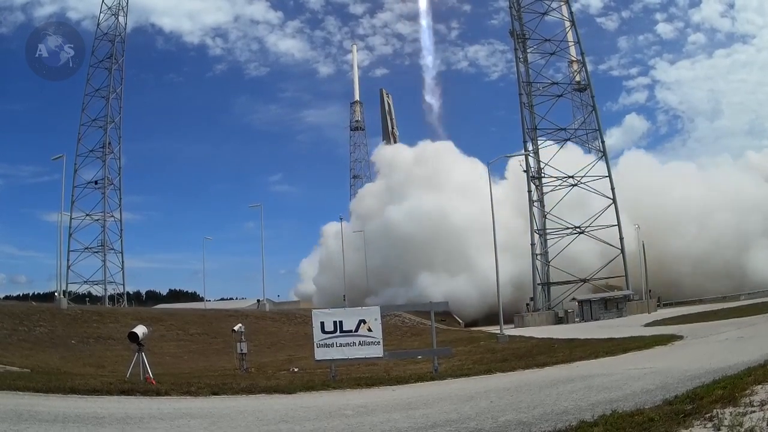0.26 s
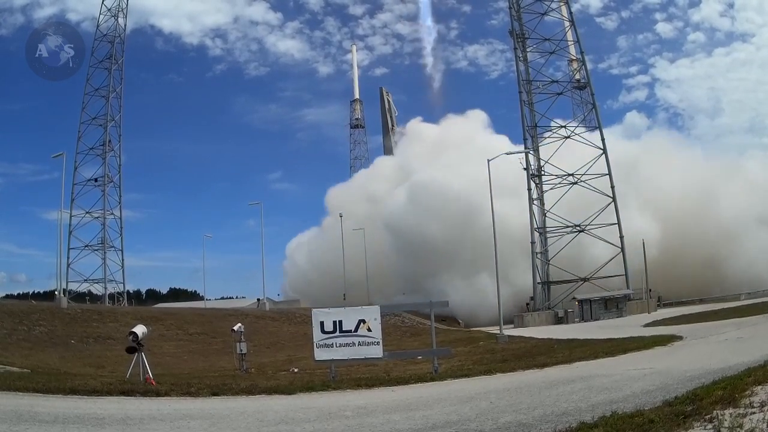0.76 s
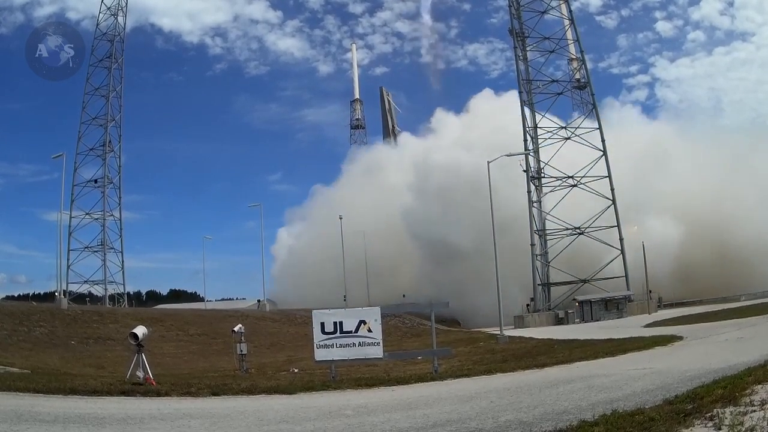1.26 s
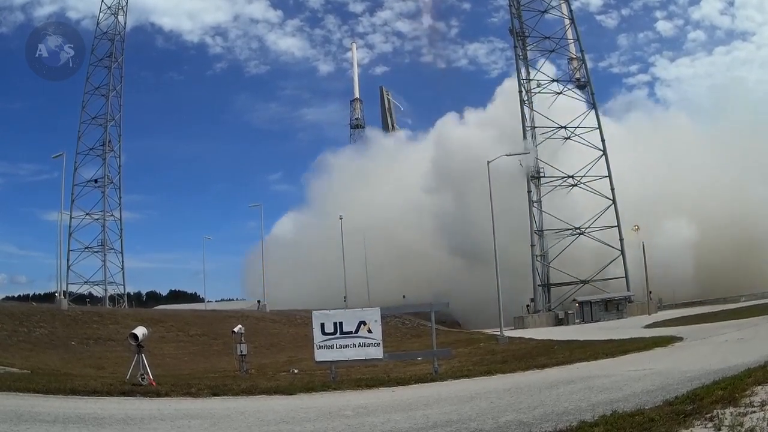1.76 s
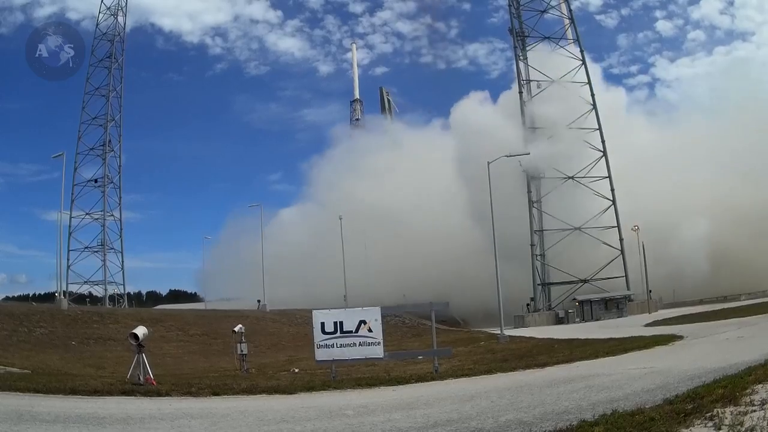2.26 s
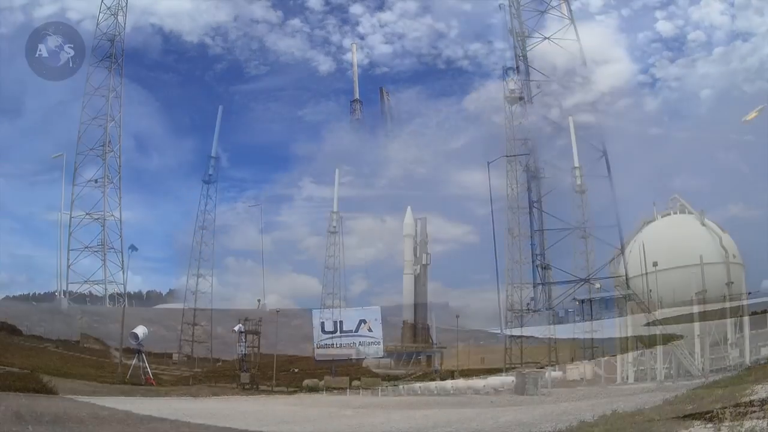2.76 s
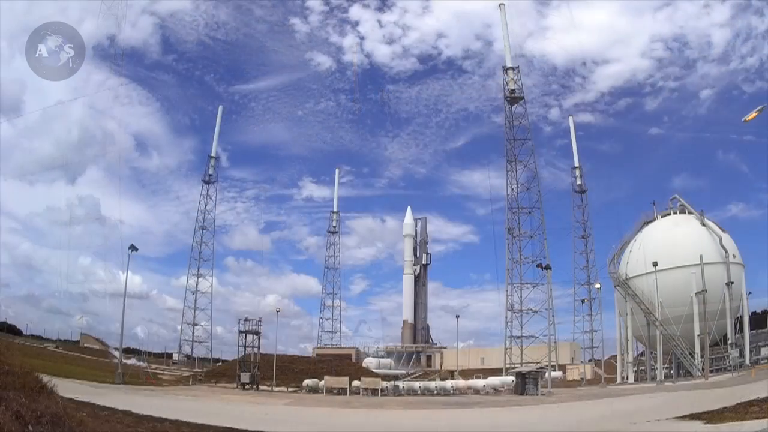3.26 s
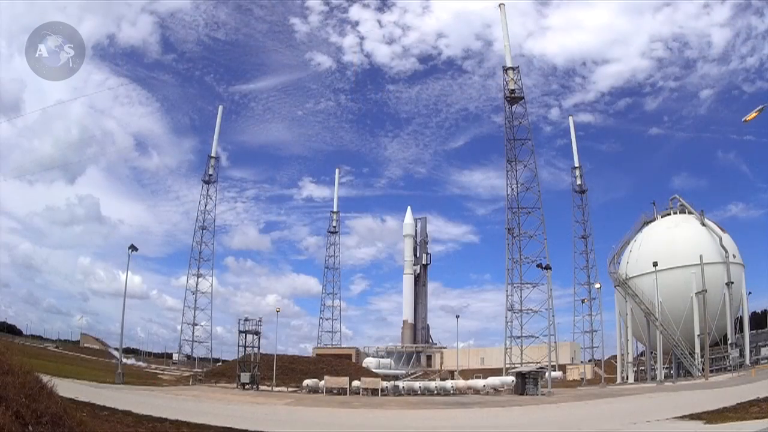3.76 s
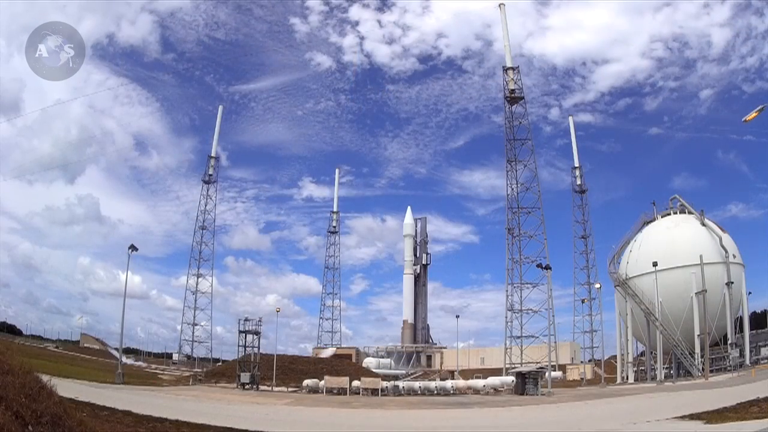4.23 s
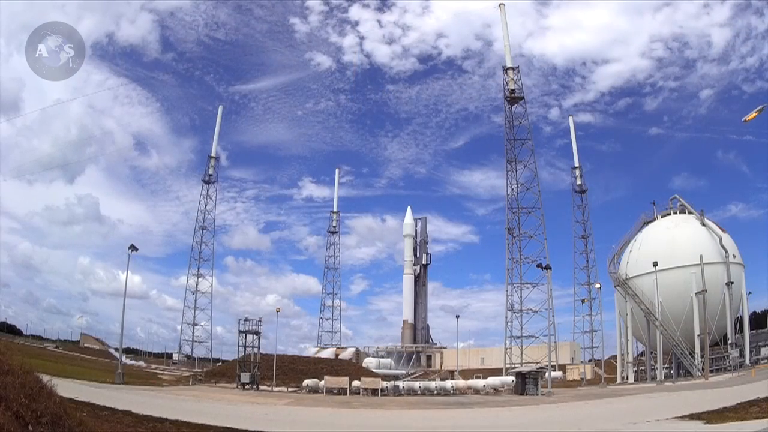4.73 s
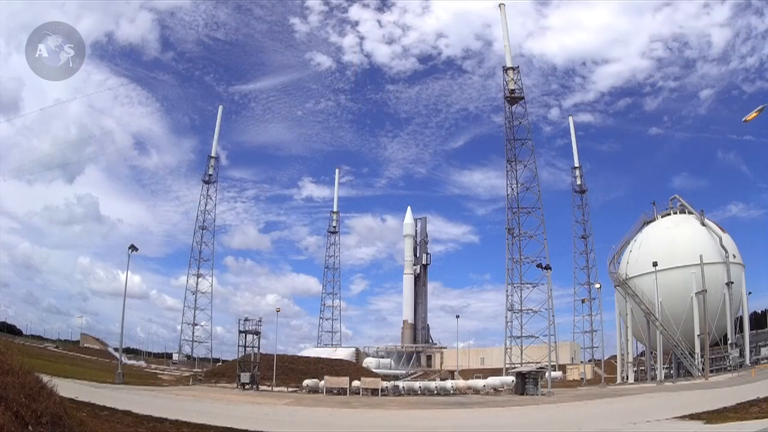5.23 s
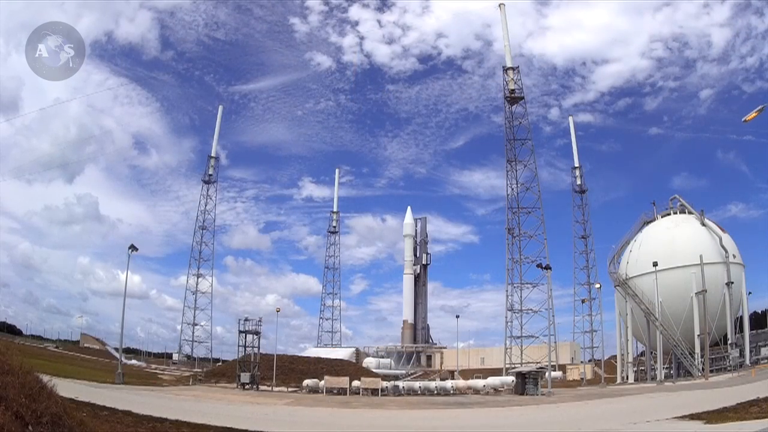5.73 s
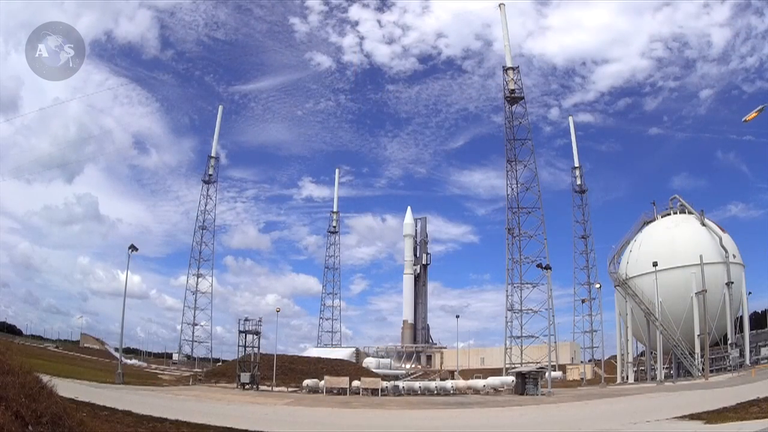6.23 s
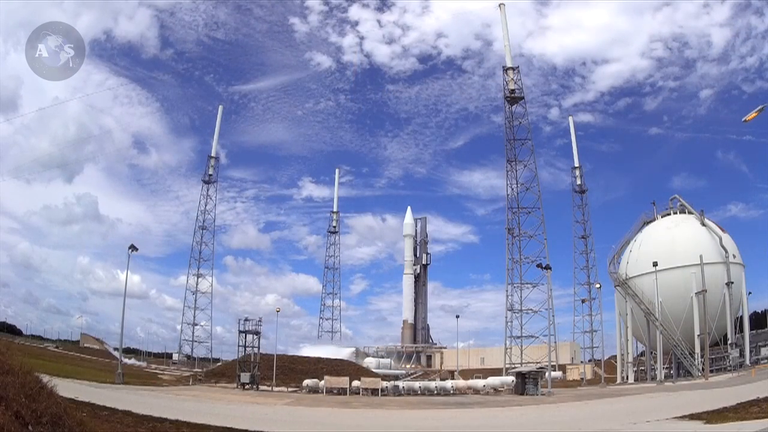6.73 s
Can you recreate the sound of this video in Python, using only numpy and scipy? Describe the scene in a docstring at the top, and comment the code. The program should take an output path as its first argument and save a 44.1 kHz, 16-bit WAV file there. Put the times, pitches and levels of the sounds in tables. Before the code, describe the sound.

A climbing rocket roars close to the launch pad, overloading the microphone into a flat, fizzy crackle. After about three seconds it cuts abruptly to much quieter water and gas jets, which hiss in growing surges over a low rumble, with faint pipe ringing and a few dull knocks. Near the end an engine lights with low hoots and booms, rising into another distorted roar.

```python
"""Launch pad, close to a rocket; two scenes, each through its own microphone.
First the climb: exhaust roar overloads the input into a flat, crackling square wave.
Cut to the seconds before lift-off: water and gas jets hiss in surges, the flame trench rumbles.
The engine lights with hoots and booms of swinging gas columns; a limiter ducks the hiss under
them, then full thrust overloads this input too."""
import sys
import numpy as np
from scipy import signal
from scipy.fft import rfft, irfft, next_fast_len
from scipy.io import wavfile

SR = 44100
rng = np.random.default_rng(int(sys.argv[2]) if len(sys.argv) > 2 else 0)


def log_audio(samples):
    """Write samples as a 16-bit WAV file to the path given in sys.argv[1]."""
    # one column per channel
    frames = np.atleast_2d(samples).T
    # limit to full scale, then quantise
    limited = np.clip(frames, -1, 1)
    pcm = np.round(limited * 32767).astype(np.int16)
    wavfile.write(sys.argv[1], SR, pcm)


N = 308252
T = np.arange(N) / SR

# flame trench rumble: freq_hz, density_db
RUMBLE_SPECTRUM = [(12, -3), (25, -2), (45, -4.5), (62, 6), (80, 1), (105, 4), (135, -1.5), (175, -0.5),
                   (260, -4.5), (350, -29), (600, -21), (1500, -46), (5000, -95)]
# dull knocks under the spray: start_s, envelope_peak_db, pitch_hz
KNOCK_EVENTS = [(3.367, -28, 260), (4.511, -27, 130), (4.858, -22, 231), (4.957, -21, 150),
                (5.077, -21, 190), (5.177, -15.5, 230), (5.973, -17, 170), (6.147, -12, 159)]
# mid rush of the spray, coloured by the microphone's housing: freq_hz, density_db
RUSH_SPECTRUM = [(100, -21), (290, -9.5), (400, -15), (510, -7), (680, -3.5), (800, -3), (1000, -0.5),
                 (1250, -5), (1600, -10), (1780, -14), (1970, -29), (2200, -33), (2800, -63), (5000, -100)]
# bright jet hiss, below 7 kHz: freq_hz, density_db
HISS_SPECTRUM = [(1300, -34), (2000, -21), (2180, -4.5), (2300, -7), (2650, 1.5), (3300, 1.5), (3950, -5.5),
                 (4200, -5.5), (4650, -12.5), (5400, -3.5), (5750, 0), (6100, -7), (6700, -22.5)]
# top of the hiss, coloured by the housing: freq_hz, density_db
HISS_TOP_SPECTRUM = [(7200, -17), (7900, -15.5), (8500, -21.5), (10100, -18.5), (11000, -29), (12200, -38),
                     (14500, -58)]
# valves opening in turn:
# start_s, rise_s, rush_db, hiss_db, rumble_db, rush_sag_db, hiss_sag_db, settle_s
VALVE_SURGES = [(3.41, 0.26, -29, -31, -43.5, 2, 3, 0.28), (3.346, 0.51, -24, -36.5, -44, 21, 24, 0.66),
                (4.5, .04, -32, -42.5, -33.5, 2.5, -6, 0.54), (5, 0.47, -26.5, -31.5, -34, 4, 15, .6),
                (5.37, .13, -18.5, -17, -29, 6, 13, 0.71)]
# brief spurts of spray: start_s, level_re_rush_db, decay_s
SPRAY_SPURTS = [(3.671, 3, .008), (3.792, 3, .009), (4.492, 10, .01), (4.515, 1, .008)]
# pipe resonances: start_s, end_s, pitch_hz, width_hz, level_re_rush_db
PIPE_MODES = [(2.893, 3.524, 910, 130, -2.5), (3.55, 4.7, 654, 40, -13), (3.55, 5.41, 1034, 50, -6.5),
              (3.55, 5.4, 3220, 60, -39), (5.417, 6.585, 1530, 198, -11), (5.427, 6.61, 880, 90, -9.5)]
# ignition hoots and booms: start_s, length_s, pitch_hz, glide_oct_per_s, level_db, noise_share
IGNITION_HOOTS = [(6.416, 0.062, 238, -0.8, -17, 0), (6.48, 0.048, 95, 5, -24, .2),
                  (6.528, 0.07, 245, 0, -22.5, 0.05), (6.574, 0.061, 88, -7, -2, 0.14),
                  (6.627, 0.1054, 84, -2, 0, 0.2), (6.723, .08, 70, -1.5, -7.5, 0.54),
                  (6.79, 0.062, 210, -0.5, -9, 0.4), (6.851, 0.053, 82, 7, 1, 0.01),
                  (6.871, .14, 188, -2, 4.5, 0.04), (6.921, 0.098, 80, 2.5, 1, 0.41)]
# exhaust roar in the air: freq_hz, density_db
ROAR_SPECTRUM = [(15, -5.5), (40, -2.5), (110, 1), (200, -2), (310, -3.5), (520, -1), (800, -4), (1620, -5),
                 (1950, -11.5), (2800, -17), (3600, -22.5), (4700, -20), (6500, -30.5), (9500, -28),
                 (15000, -35.5)]
# fizz on the overloaded roar: freq_hz, density_db
FIZZ_SPECTRUM = [(30, 1), (500, -2), (2000, -32), (5000, 1), (9000, -1), (14000, -7)]


def amp(db):
    """Decibels to gain."""
    return 10 ** (np.asarray(db) / 20)


def unit_rms(x):
    """Scale to rms 1."""
    return x / np.sqrt(np.mean(x ** 2) + 1e-20)


def colour(x, spectrum):
    """Filter by (freq_hz, density_db) points; rms 1."""
    freq_hz, density_db = np.transpose(spectrum)
    size = next_fast_len(N)
    bin_hz = np.fft.rfftfreq(size, 1 / SR)
    gain = amp(np.interp(np.log(bin_hz + 1), np.log(freq_hz), density_db)) * (bin_hz > 0)
    return unit_rms(irfft(rfft(x, size) * gain, size)[:N])


def drift(bandwidth_hz):
    """Smooth random wander; rms 1."""
    size = next_fast_len(N)
    bin_hz = np.fft.rfftfreq(size, 1 / SR)
    gain = np.exp(-(bin_hz / bandwidth_hz) ** 2) * (bin_hz > 0)
    return unit_rms(irfft(rfft(rng.standard_normal(size)) * gain, size)[:N])


def turbulence(spectrum, flutter_db, flutter_hz):
    """Noise modulated by eddies, then coloured; rms 1."""
    return colour(rng.standard_normal(N) * amp(flutter_db * drift(flutter_hz)), spectrum)


def ramp(start_s, rise_s):
    """Smooth step, 0 to 1."""
    return np.sin(np.pi / 2 * np.clip((T - start_s) / rise_s, 0, 1)) ** 2


def rumble():
    """Lumpy low turbulence from the flame trench; rms 1."""
    return turbulence(RUMBLE_SPECTRUM, flutter_db=0.5, flutter_hz=25)


def knocks(rise_s=0.0012):
    """Short pressure pulses, a cycle or two each."""
    out = np.zeros(N)
    for start_s, peak_db, pitch_hz in KNOCK_EVENTS:
        age_s = np.maximum(T - start_s, 0)
        envelope = age_s / rise_s * np.exp(1 - age_s / rise_s)
        out += amp(peak_db) * envelope * np.sin(2 * np.pi * pitch_hz * age_s)
    return out


def pipes(fade_s=0.025, band_hz=(550, 3500)):
    """Pipes ring while jets flow: noise-driven resonances, of which only the mid band carries."""
    out = np.zeros(N)
    for start_s, end_s, pitch_hz, width_hz, level_db in PIPE_MODES:
        radius = np.exp(-np.pi * width_hz / SR)
        feedback = [1, -2 * radius * np.cos(2 * np.pi * pitch_hz / SR), radius ** 2]
        ring = unit_rms(signal.lfilter([1, 0, -1], feedback, rng.standard_normal(N)))
        gate = np.clip(np.minimum(T - start_s, end_s - T) / fade_s, 0, 1)
        out += amp(level_db) * gate * ring
    return signal.sosfilt(signal.butter(2, band_hz, "band", fs=SR, output="sos"), out)


def valve_flow(idle_rush_db=-38.5, idle_hiss_db=-44, idle_rumble_db=-46):
    """Rush, hiss and rumble gains: each jet surges, then settles; jets add in power."""
    power = amp([[idle_rush_db], [idle_hiss_db], [idle_rumble_db]]) ** 2 * np.ones(N)
    for surge in VALVE_SURGES:
        start_s, rise_s, rush_db, hiss_db, rumble_db, rush_sag_db, hiss_sag_db, settle_s = surge
        sag = 1 - np.exp(-np.maximum(T - start_s - rise_s, 0) / settle_s)
        levels_db = [rush_db - rush_sag_db * sag, hiss_db - hiss_sag_db * sag, np.full(N, rumble_db)]
        power += (ramp(start_s, rise_s) * amp(levels_db)) ** 2
    return np.sqrt(power)


def spray(rush_gain, hiss_gain, rush_trim_db=-1, flutter_db=0.22, spurt_rise_s=0.0025):
    """Water and gas jets: mid rush, bright hiss, spurts and ringing pipes."""
    rush = turbulence(RUSH_SPECTRUM, flutter_db=0.64, flutter_hz=70)
    hiss = turbulence(HISS_SPECTRUM + HISS_TOP_SPECTRUM, flutter_db=0.5, flutter_hz=150)
    spurts = np.zeros(N)
    for start_s, level_db, decay_s in SPRAY_SPURTS:
        attack = np.clip((T - start_s) / spurt_rise_s, 0, 1)
        spurts += amp(level_db) * attack * np.exp(-((T - start_s) / decay_s) ** 2)
    rush = rush * np.hypot(1, spurts) + pipes()
    hiss = hiss * np.hypot(1, 0.31 * spurts)
    jets = rush * rush_gain * amp(rush_trim_db) + hiss * hiss_gain
    return jets / amp(flutter_db * drift(bandwidth_hz=50))


def ignition(waver_hz=7, shake_db=3, edge_s=0.017):
    """The lighting engine sets gas columns swinging: unsteady low tones with gusts of rumble."""
    out = np.zeros(N)
    gust = rumble()
    detune_hz = waver_hz * drift(bandwidth_hz=76)
    shake = amp(shake_db * drift(bandwidth_hz=66))
    for start_s, length_s, pitch_hz, glide_oct_per_s, level_db, noise_share in IGNITION_HOOTS:
        freq_hz = pitch_hz * 2 ** (glide_oct_per_s * np.clip(T - start_s, 0, length_s)) + detune_hz
        tone = np.sqrt(2) * shake * np.sin(2 * np.pi * np.cumsum(freq_hz) / SR)
        gate = ramp(start_s, edge_s) * (1 - ramp(start_s + length_s - edge_s, edge_s))
        out += amp(level_db) * gate * (np.sqrt(1 - noise_share) * tone + np.sqrt(noise_share) * gust)
    return out


def engine(flame_db=-18, rush_db=-5, tearing_db=-14, roar_db=-19, rumble_db=3.5):
    """The flame catches with a rush; thrust builds to a tearing roar over heavy rumble."""
    rush = turbulence(RUSH_SPECTRUM, flutter_db=1, flutter_hz=60)
    tearing = turbulence(HISS_SPECTRUM + HISS_TOP_SPECTRUM, flutter_db=3, flutter_hz=200)
    roar = turbulence(ROAR_SPECTRUM, flutter_db=3, flutter_hz=200)
    flame = amp(flame_db) * rush
    thrust = amp(rush_db) * rush + amp(tearing_db) * tearing
    thrust += amp(roar_db) * roar + amp(rumble_db) * rumble()
    return flame * ramp(start_s=6.48, rise_s=0.055) + thrust * ramp(start_s=6.75, rise_s=0.17)


def limiter(x, threshold_db=-13.5, slope=0.73, max_cut_db=8, recovery_db_per_s=100, window_s=0.015):
    """Gain drops on loud sound, so booms duck the hiss; full thrust outruns it."""
    pole = np.exp(-1 / (window_s * SR))
    level_db = 10 * np.log10(signal.lfilter([1 - pole], [1, -pole], x ** 2) + 1e-12)
    fall_db = recovery_db_per_s * T
    held_db = np.maximum.accumulate(level_db + fall_db) - fall_db
    return x / amp(np.clip(slope * (held_db - threshold_db), 0, max_cut_db))


def before_liftoff(rail_db=-7.5, rail_give=0.015, bias=0.02, input_hiss_db=-72):
    """Jets and engine start, limited, then hard-clipped: high peaks crackle."""
    rush_gain, hiss_gain, rumble_gain = valve_flow()
    air = spray(rush_gain, hiss_gain) + rumble_gain * rumble() + knocks() + ignition() + engine()
    limited = limiter(air)
    clipped = np.clip(limited, bias - amp(rail_db), bias + amp(rail_db))
    return clipped + rail_give * (limited - clipped) + amp(input_hiss_db) * rng.standard_normal(N)


def climb(drive_db=18, bias=0.24, square_db=-11, fizz_db=-33.5, echo_gain=0.13, echo_s=0.0056):
    """Roar slams the input rail to rail; low gusts pin it briefly, which crackles. Fizz on top."""
    roar = turbulence(ROAR_SPECTRUM, flutter_db=3.5, flutter_hz=85.5)
    ground_echo = np.interp(T - echo_s, T, roar)
    driven = amp(drive_db) * (roar + echo_gain * ground_echo - bias)  # longer on the lower rail
    square = driven / (1 + driven ** 4) ** (1 / 4)  # saturates at +/-1
    fizz = colour(rng.standard_normal(N), FIZZ_SPECTRUM)
    return amp(square_db) * (square - square.mean()) + amp(fizz_db) * fizz


def scene(cut_s=2.944):
    """Hard cut from the climb to the seconds before lift-off; mono."""
    return np.where(T < cut_s, climb(), before_liftoff())[None]


def record(dry):
    """Recorder band limit."""
    cutoff_hz = 14600
    taps = signal.firwin(255, cutoff_hz, window=("kaiser", 8), fs=SR)
    return signal.oaconvolve(dry, taps[None], "same")


dry = scene()
out = record(dry)
log_audio(out)
```